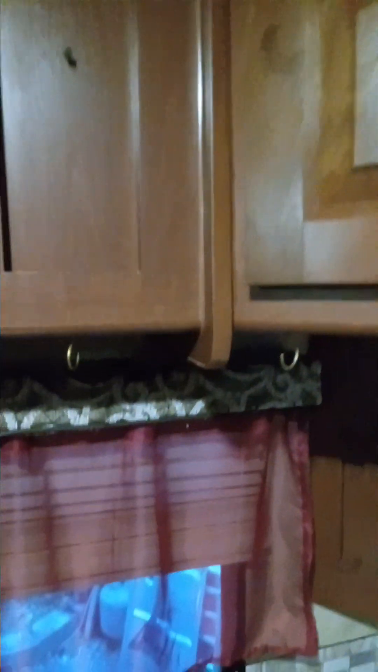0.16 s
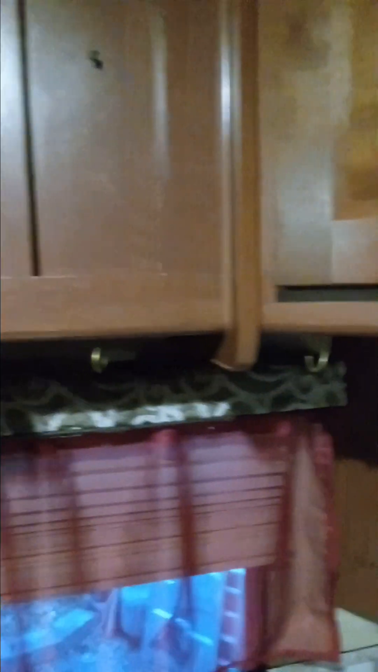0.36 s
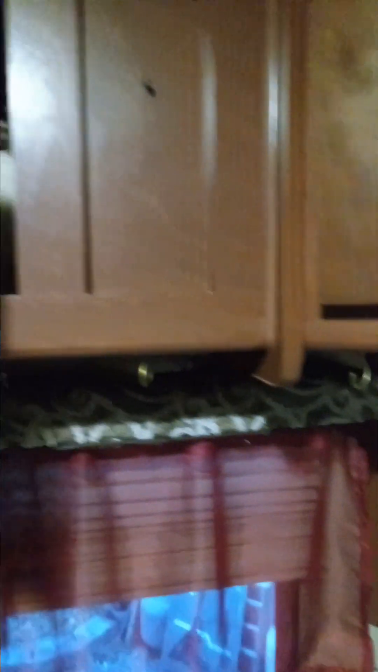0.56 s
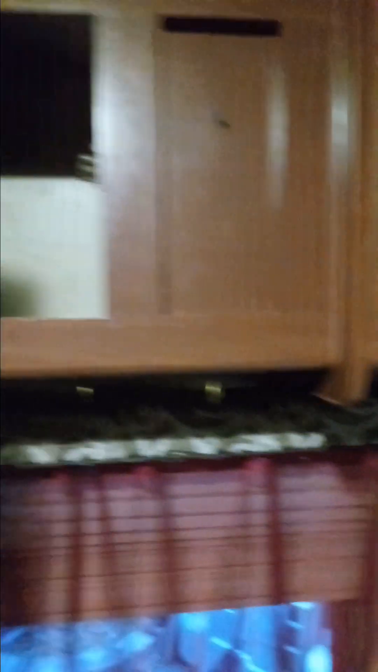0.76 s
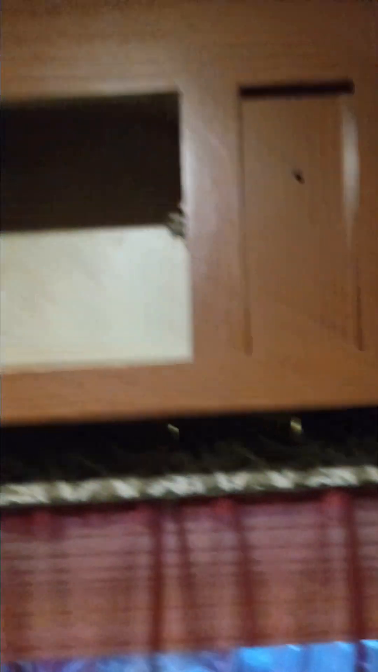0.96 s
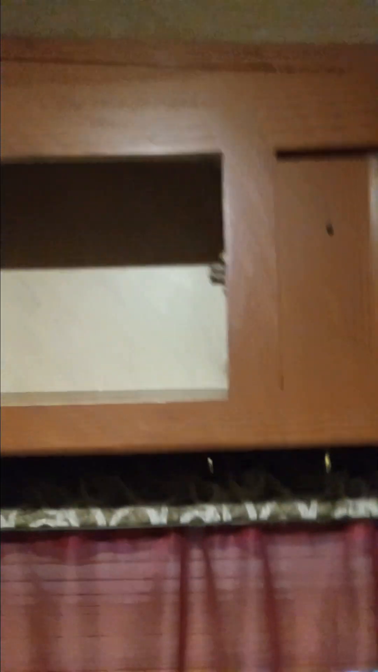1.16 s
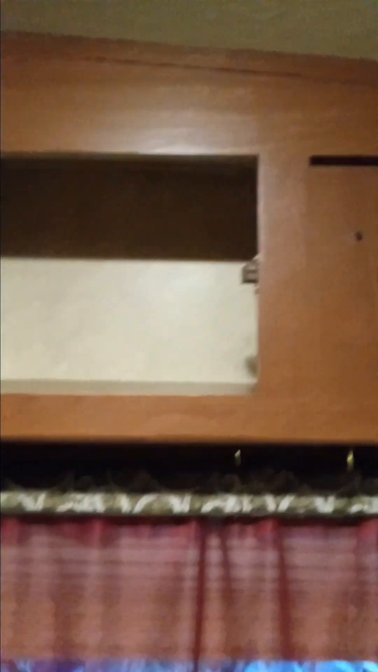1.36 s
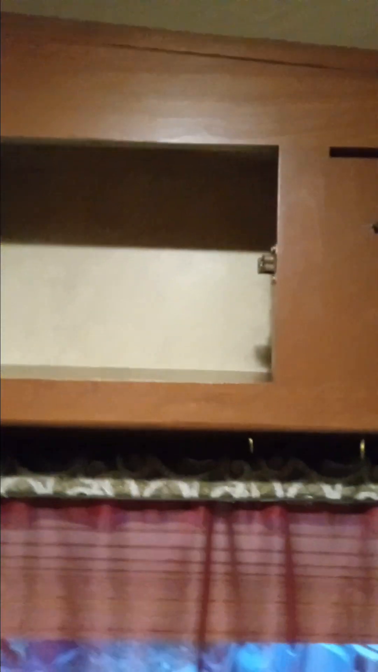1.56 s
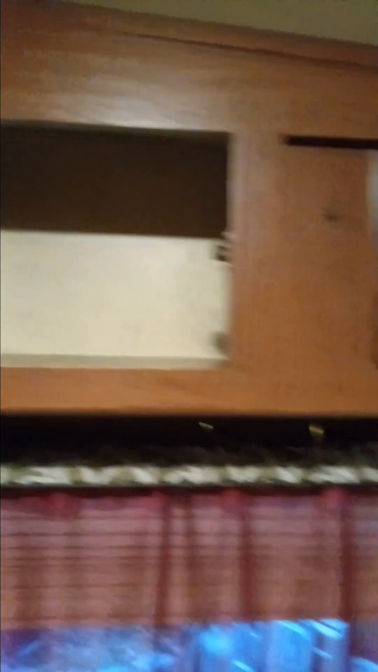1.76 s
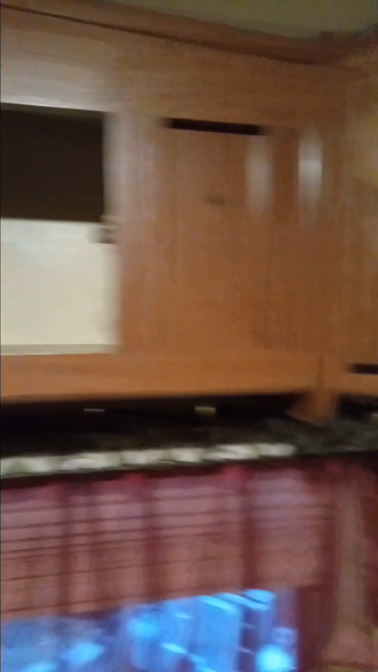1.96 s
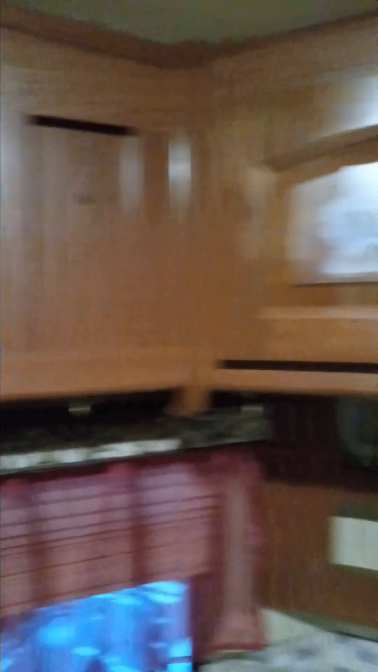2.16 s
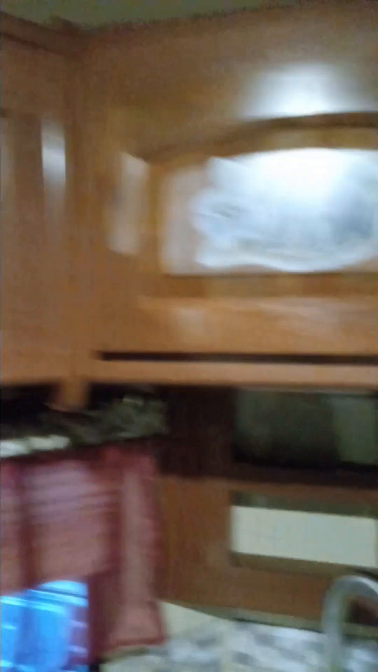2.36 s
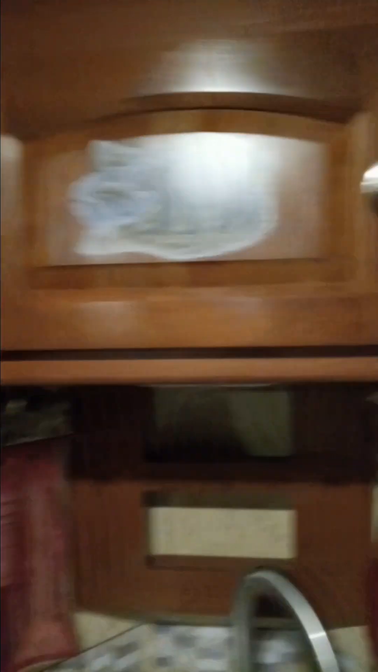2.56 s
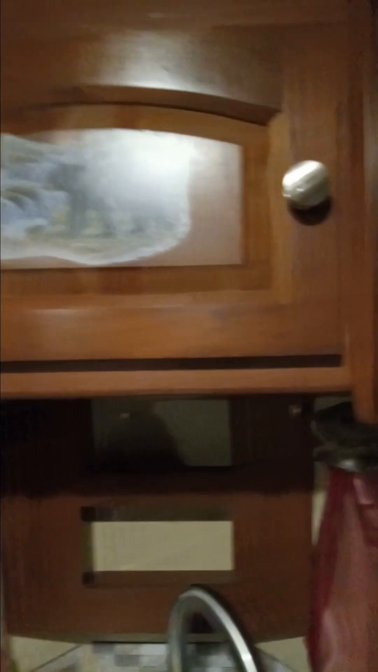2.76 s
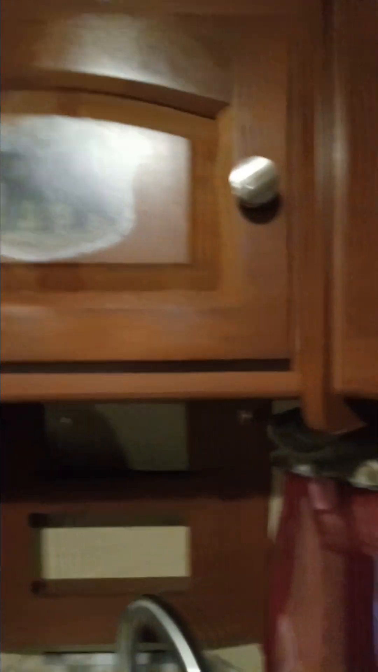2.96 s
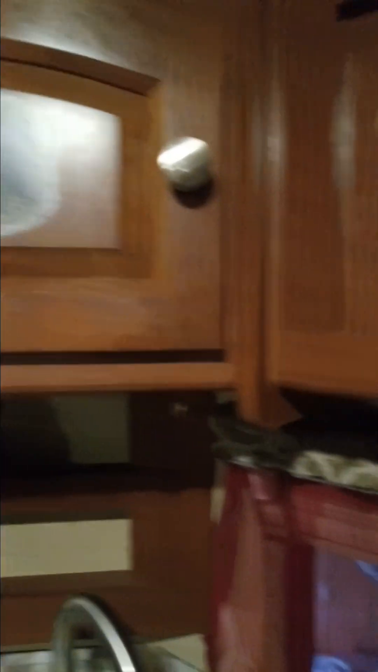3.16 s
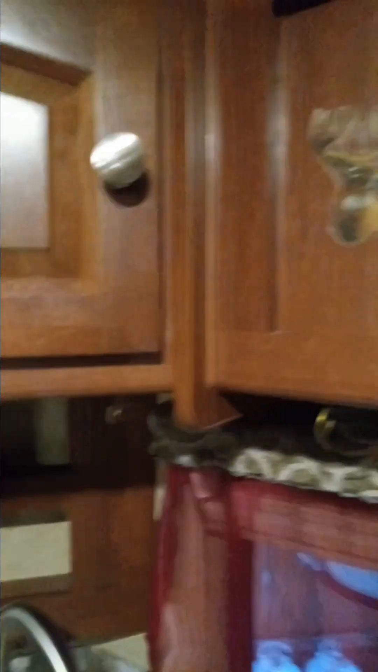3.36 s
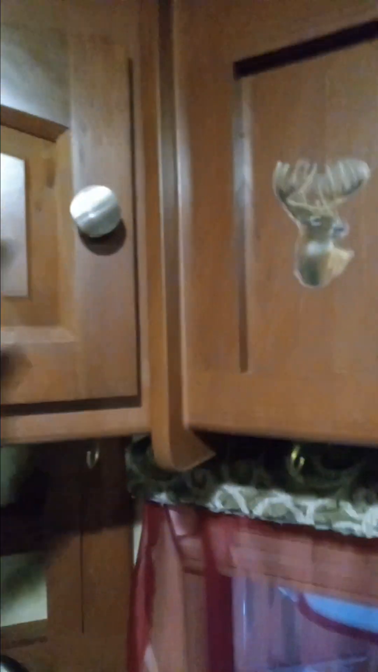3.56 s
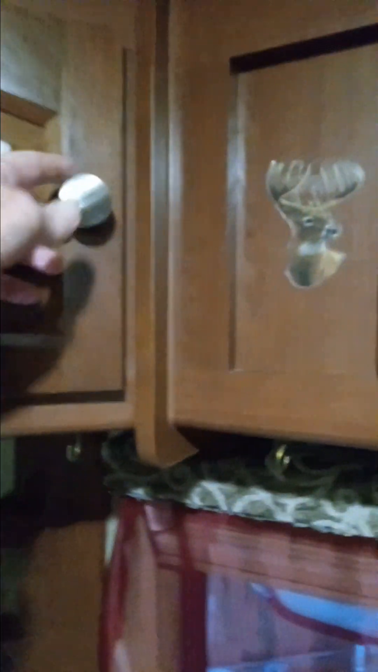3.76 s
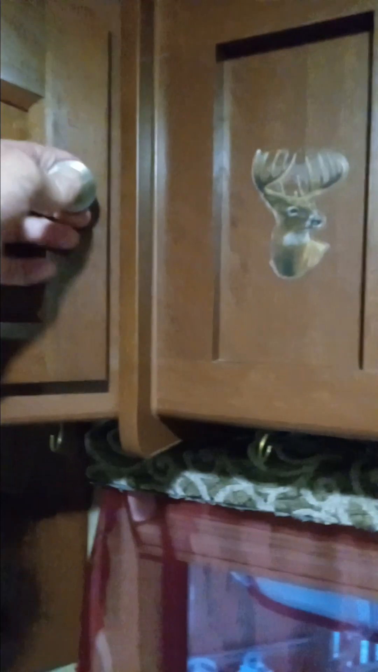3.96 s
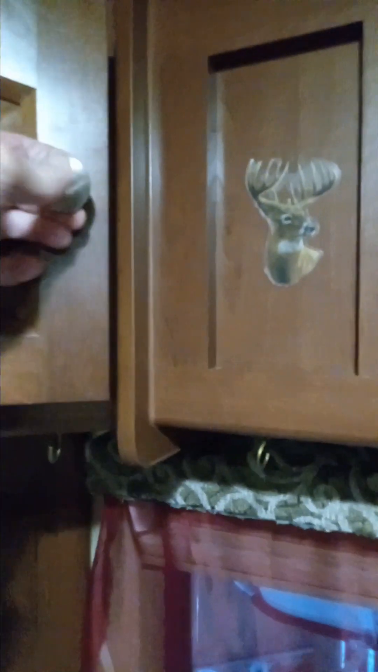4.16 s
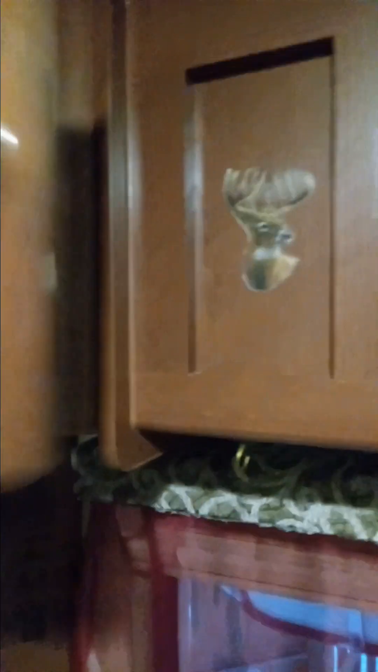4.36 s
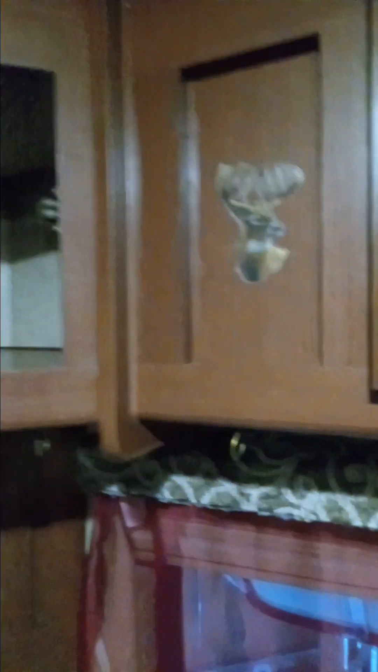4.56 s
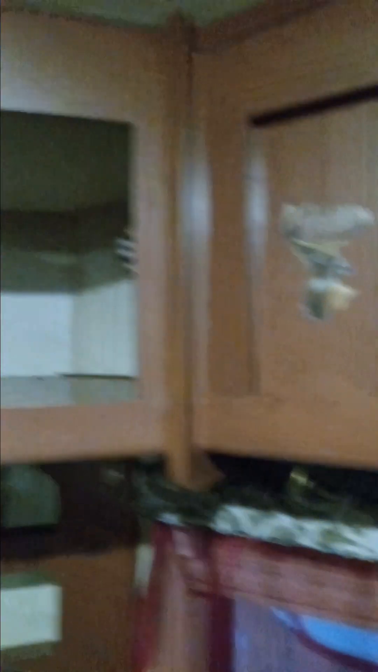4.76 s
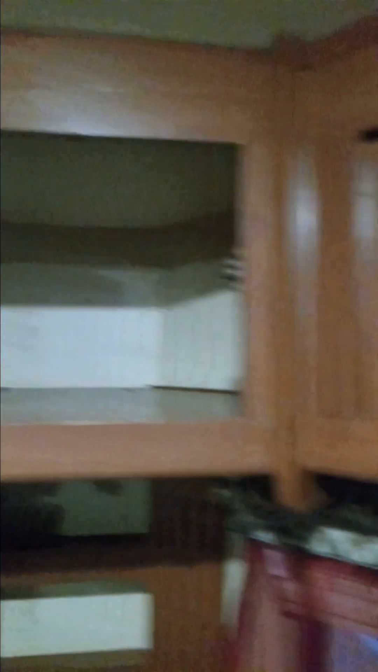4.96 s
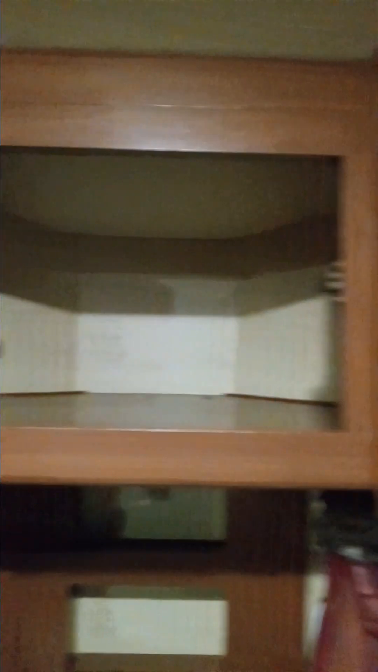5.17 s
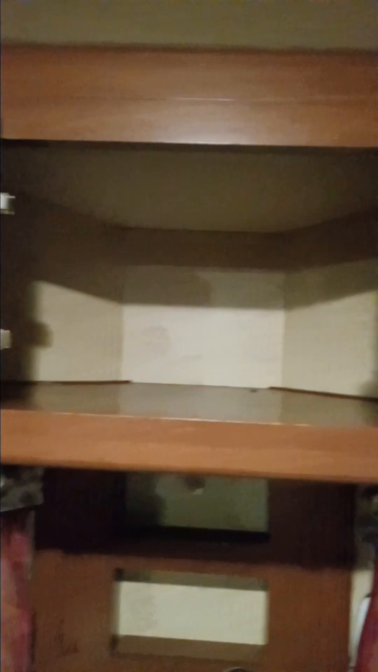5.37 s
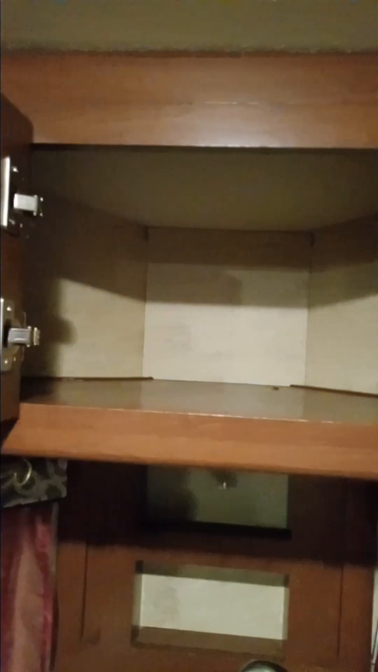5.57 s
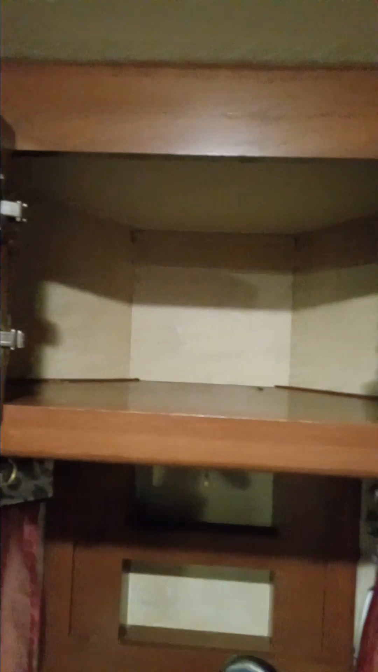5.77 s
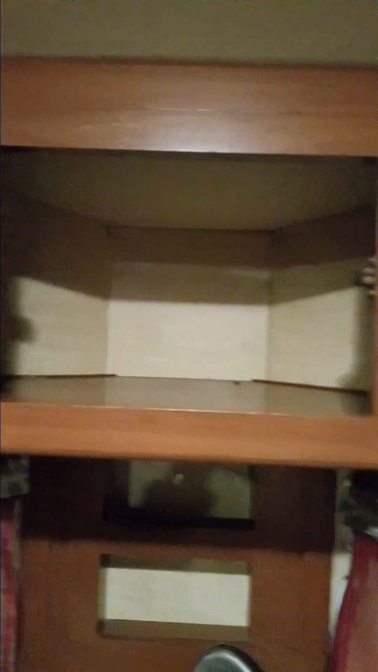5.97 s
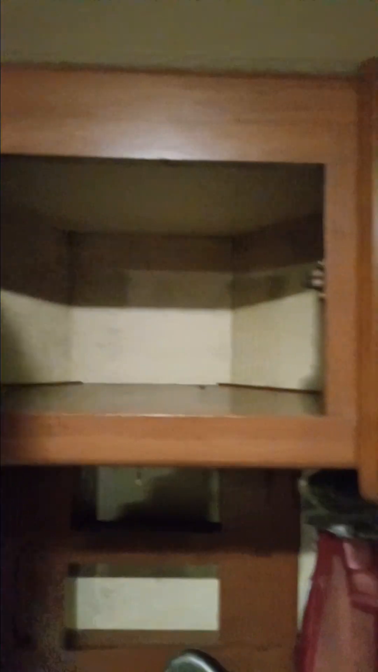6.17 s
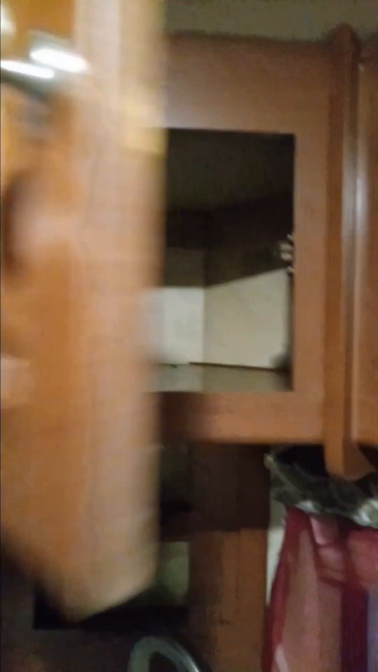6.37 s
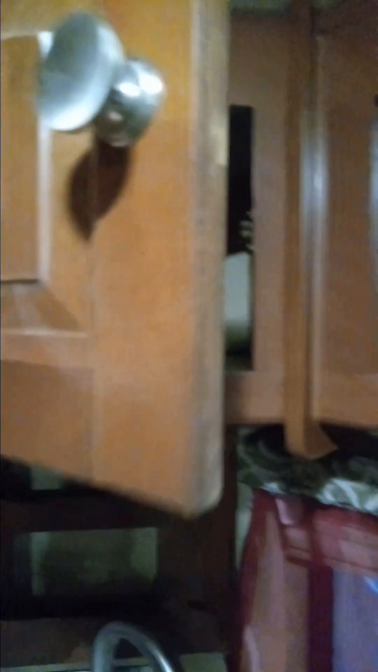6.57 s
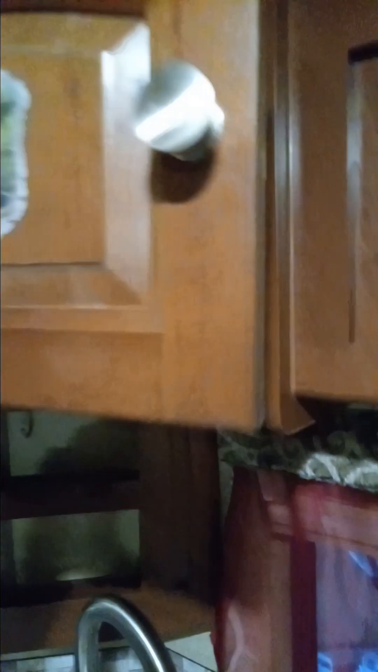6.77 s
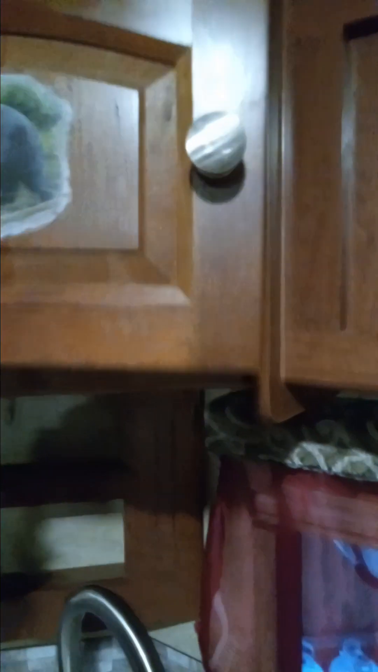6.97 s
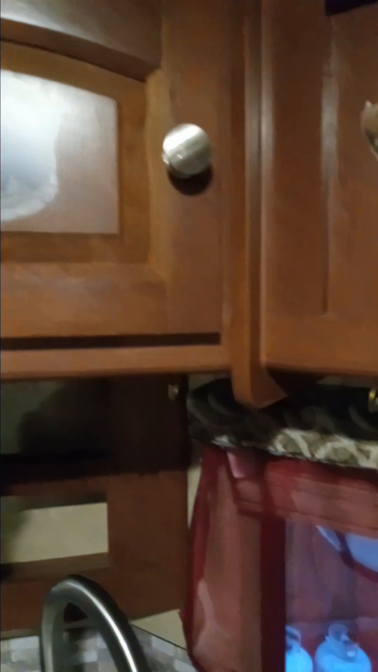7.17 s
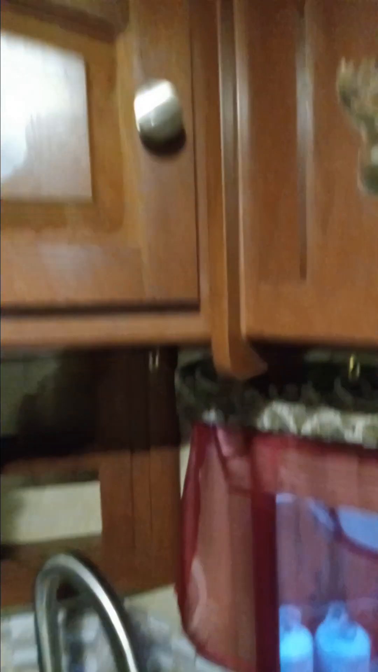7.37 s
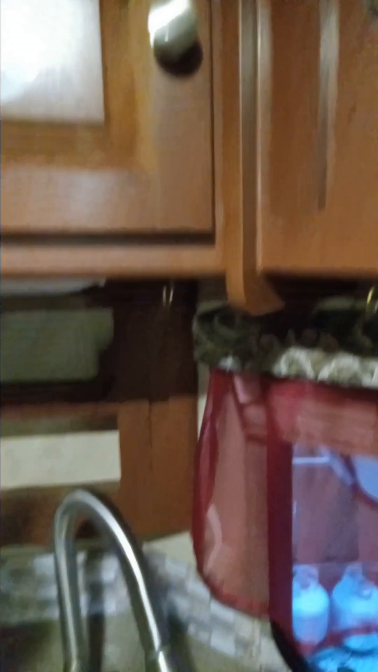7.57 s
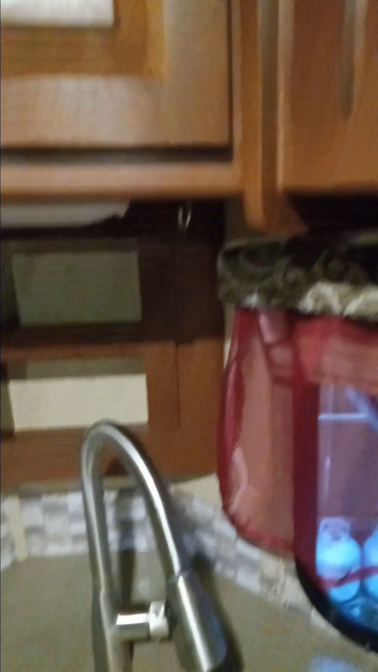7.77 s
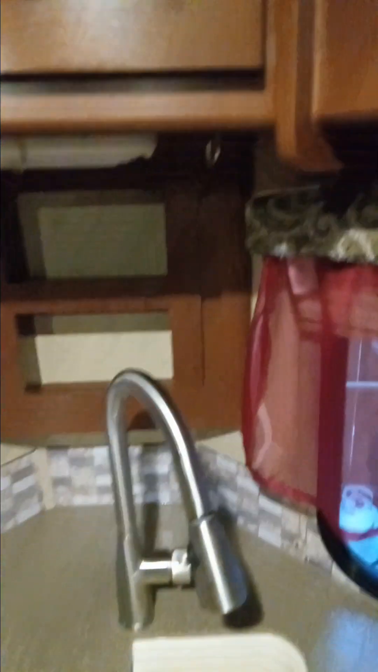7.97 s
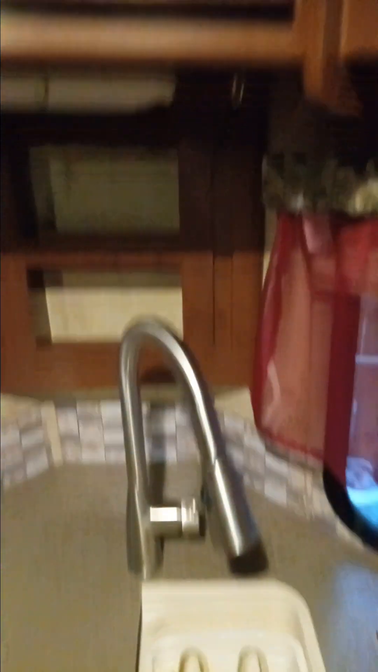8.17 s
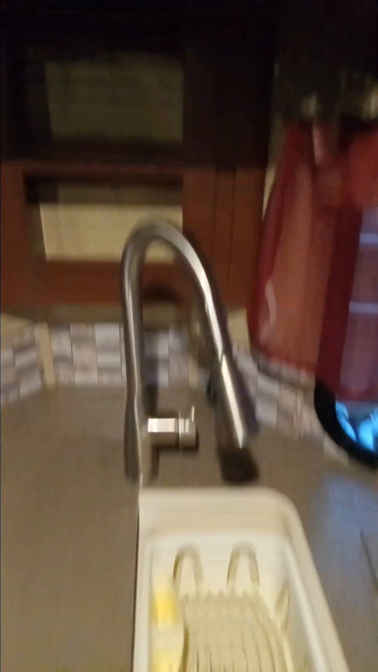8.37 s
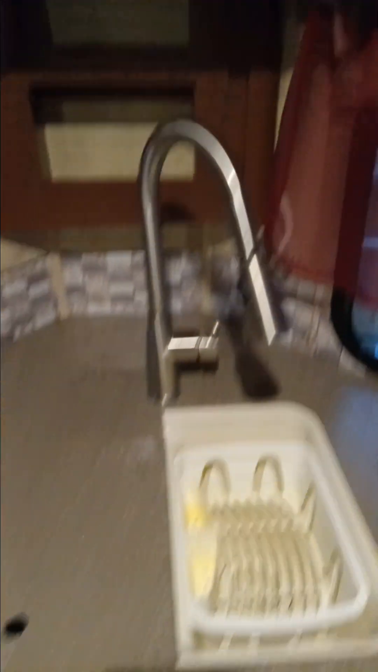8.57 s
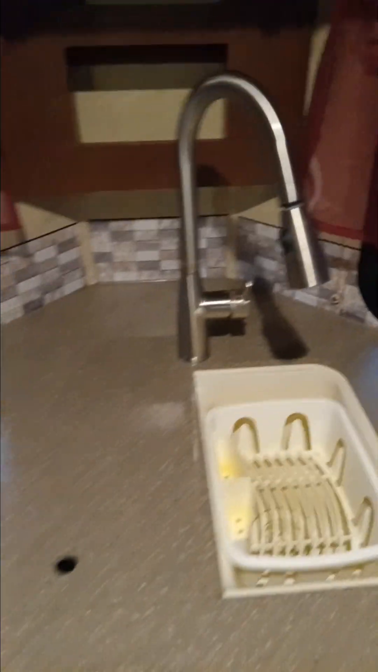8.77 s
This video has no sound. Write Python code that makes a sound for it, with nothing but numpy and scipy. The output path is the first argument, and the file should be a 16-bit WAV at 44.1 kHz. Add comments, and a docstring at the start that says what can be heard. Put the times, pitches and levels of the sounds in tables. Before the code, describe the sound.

Close, scattered wooden thumps and latch clicks as cupboard doors open and close, ending in a slam over faint hiss.

```python
"""A wooden cabinet door thumps and clacks over a faint hiss; more doors open and shut in a small,
thin-walled kitchen, close to a phone. Blows excite the damped modes of panels and walls, and catches
rattle and ring. Sliding friction makes hands and feet scuff and a hinge squeak before a door slams.
The phone's noise suppressor holds the hiss down and cuts the tails short."""
import sys
import numpy as np
from scipy import signal
from scipy.io import wavfile
from scipy.ndimage import uniform_filter1d

SR = 44100
rng = np.random.default_rng(int(sys.argv[2]) if len(sys.argv) > 2 else 0)


def transcribe(u):
    """Save the signal u as a 16-bit wav file named by the first command-line argument.

    u: samples, shape (n,) or (channels, n), limited to [-1, 1]; the rate is SR.
    q: integer samples, one column per channel.
    """
    v = np.clip(np.atleast_2d(u).T, -1, 1)
    q = np.round(v * 32767).astype(np.int16)
    wavfile.write(sys.argv[1], SR, q)


N = 388515


def gain_of(db):
    return 10 ** (np.asarray(db) / 20)


def unit_rms(x):
    return x / np.sqrt(np.mean(x ** 2) + 1e-20)


def curve_at(points, hz):
    """Interpolation along a logarithmic frequency axis."""
    f, value = np.transpose(points)
    return np.interp(np.log(hz + 1), np.log(f + 1), value)


def add(mix, start, sound):
    part = mix[round(start * SR):][:len(sound)]
    part += sound[:len(part)]


def roughness(n, depth_db, span):
    """Log-normal amplitude modulation, smoothed over span samples."""
    return gain_of(depth_db * unit_rms(uniform_filter1d(rng.standard_normal(n), span)))


def colour(x, gain_db):
    """Minimum-phase filtering by a function from Hz to dB, scaled to unit power gain."""
    hz = abs(np.fft.fftfreq(2048, 1 / SR))
    log_gain = np.log(gain_of(np.maximum(gain_db(hz), -100)))
    taps = np.fft.ifft(np.exp(np.conj(signal.hilbert(log_gain)))).real[:1024]
    return signal.oaconvolve(x, taps / np.linalg.norm(taps))[:len(x)]


def modal_ring(modes, centre_hz, octaves, stretch, seconds, bend=1):
    """Superposition of damped modes near centre_hz, peak 1; stretch scales T60, bend > 1 delays the fall."""
    hz, db, t60 = np.transpose(modes)[:, :, None]
    t = np.arange(round(seconds * SR)) / SR
    detune = 1 + 0.028 * rng.uniform(-0.79, 1, hz.shape)
    excitation = gain_of(db) * np.exp(-.5 * (np.log2(hz / centre_hz) / octaves) ** 2)
    decay = np.exp(-np.log(1000) * (t / (t60 * stretch)) ** bend)
    sound = (excitation * decay * np.sin(2 * np.pi * hz * detune * t)).sum(0)
    return sound / abs(sound).max()


# Spectrum of the noise floor once suppressed: f/Hz, relative level/dB
HISS_SPECTRUM = [(25, -32.5), (60, -17), (110, -9.5), (190, -8), (300, -3), (400, -6), (500, -16.5),
                 (650, -10), (1100, -15), (1330, -6), (2150, -7), (2700, -16.5), (4800, -22), (6500, -21),
                 (8500, -32), (10000, -42.5), (14000, -45.5), (15200, -38.5)]
# Slow drift of the noise floor: t/s, gain/dB
HISS_LEVELS = [(0, 3.5), (1.5, 1), (3.502, 2), (4.5, 1.5), (6, 0), (7.598, 1.5), (8.8, 1.5)]
# Greatest attenuation by the suppressor: f/Hz, depth/dB
SUPPRESSION = [(50, 4.5), (150, 13.5), (300, 10), (1000, 3.5), (3000, 5), (8000, 7.5)]


def hiss():
    """Gaussian noise of room and microphone, faintly patchy, at its level before suppression."""
    frames, hz = N // 256 + 5, np.fft.rfftfreq(1024, 1 / SR)
    real, imag, patches = rng.standard_normal((frames, 513, 3)).T
    patches = unit_rms(uniform_filter1d(uniform_filter1d(patches, 10, 0), 12, 1))
    drift_db = np.interp(np.arange(frames) * 256 / SR, *np.transpose(HISS_LEVELS))
    shape = unit_rms(gain_of(curve_at(HISS_SPECTRUM, hz)))
    floor = gain_of(-68.5 + curve_at(SUPPRESSION, hz)) * shape
    spectra = (real + 1j * imag) * floor[:, None] * gain_of(0.9 * patches + drift_db)
    return signal.istft(spectra, nperseg=1024, noverlap=768)[1][:N] / np.sqrt(512)


# Low modes of walls and doors: f/Hz, relative level/dB, unscaled T60/s
WOOD_MODES = [(45, 1, .3), (57.85, 6.5, 1), (79.3, 6.5, 0.41), (99.54, 4.5, 0.57), (126.2, 6.5, 0.29),
              (143, -3.5, .3), (174.5, 1, 0.43), (194.2, 4, 0.57), (221.6, 5, 0.25), (247.5, 2.5, 0.35),
              (300, 11.5, 0.4), (358, 10, 0.19), (399, 3, 0.36)]
# Blows on doors, walls and floor, levels before the envelope:
# t/s, boom level/dB, boom f/Hz, knock level/dB, knock f/Hz, free ringing time/s
BLOWS = [(.002, -35, 161, -30, 177, 0.052), (.037, -38.5, 168, -32, 238, .1),
         (.124, -24.5, 125, -21.5, 207, 0.13), (.16, -24.5, 109.5, -14.5, 222, 0.12),
         (.198, -28, 97.5, -23.5, 233, 0.059), (.234, -32, 104, -26.5, 200, .1),
         (0.41, -34, 135, -33.5, 222.5, 0.088), (.452, -46.5, 144, -52, 206, 0.13),
         (.533, -51.5, 65.6, -55, 215, 0.048), (.621, -43.5, 74.8, -48, 205, .11),
         (2.01, -35.5, 150, -17.5, 219, 0.087), (2.048, -42, 126.7, -52, 221, 0.1),
         (2.2, -50, 90, -43.5, 214, .09), (2.231, -55, 134, -59, 170, 0.07),
         (2.31, -55.5, 57.6, -57, 374, .11), (2.437, -36.5, 125, -38, 216, 0.097),
         (2.567, -17.5, 106, -19, 303, 0.048), (2.622, -30.5, 117, -28, 201, 0.16),
         (2.686, -27.5, 131, -26.5, 212, 0.1), (2.8, -35.5, 83.6, -51, 179, 0.058),
         (2.907, -18, 91.7, -14.5, 204, 0.12), (2.941, -17, 103, -11, 222, 0.077),
         (2.978, -34.5, 88.7, -21, 232, 0.12), (3.051, -27, 102, -33, 173, .08),
         (3.131, -27, 89, -26.5, 212, 0.058), (3.2, -33, 94.4, -55, 180, 0.088),
         (3.256, -49.5, 83.5, -61.5, 178.3, .075), (3.701, -44, 129.3, -68, 176, .1),
         (3.755, -44.5, 94, -59, 194, .055), (3.862, -41, 79.7, -71.5, 172.5, 0.066),
         (3.99, -30.5, 106, -28, 402, 0.065), (4.011, -32.5, 79, -34.5, 382, .07),
         (4.055, -29, 131, -27.5, 213, 0.058), (4.154, -34.5, 118, -32.5, 230, .08),
         (4.2, -57.5, 128, -45.5, 258, .09), (6.118, -52, 92, -60, 304, 0.084),
         (6.189, -54, 111.3, -52, 164, 0.12), (6.399, -46.5, 160, -63, 170, .1),
         (6.444, -37, 115.5, -68, 172, .075), (6.5, -46, 97.2, -60, 173, .09),
         (6.56, -48.5, 98, -59.5, 173, 0.143), (6.7, -56, 97, -53, 401, .12),
         (6.87, -45, 104, -58, 236, 0.13), (6.932, -31, 110.4, -62.5, 195, 0.15),
         (6.961, -29, 107, -27.5, 199, .11), (7.005, -5, 123, -12, 177, .04),
         (7.04, -23, 113, -15, 223, 0.17), (7.069, -19, 61, -18.5, 173, .085),
         (7.138, -19.5, 133, -26.5, 177, 0.078), (7.24, -34.5, 142, -33.5, 171, .11),
         (7.31, -35, 88.8, -60, 175, .085), (7.388, -42, 73, -63, 171, 0.088),
         (7.441, -53, 75.3, -57.5, 203.9, .09), (7.66, -60, 81.8, -66.5, 380, .1),
         (8.24, -61.5, 58.2, -75, 298, .07)]


def thumps():
    """Impact excitation: a soft blow drives low modes, a boom of the walls and a higher knock of the door."""
    out = np.zeros(N)
    for start, boom_db, boom_hz, knock_db, knock_hz, free_s in BLOWS:
        stretch = free_s / 0.15
        boom = modal_ring(WOOD_MODES[:7], boom_hz, 0.31, stretch, seconds=.3, bend=1.6)
        knock = modal_ring(WOOD_MODES[5:], knock_hz, 0.217, 0.94 * stretch, seconds=.3, bend=0.89)
        t = np.arange(len(boom)) / SR
        envelope = (1 - np.exp(-t / .0038)) / (1 + (t / free_s) ** 2.7)
        add(out, start, -(gain_of(boom_db) * boom + gain_of(knock_db) * knock) * envelope)
    return out


# Spectra of hard contact, its top octave and the door edge: f/Hz, relative level/dB
TREBLE_SPECTRUM = [(1530, -12.5), (2600, -7.5), (3310, -8.5), (3610, -6), (3920, -5), (5000, -7),
                   (5410, -6.5), (6260, 0), (6660, -2.5), (7050, -5), (10000, -23.5), (13000, -45),
                   (22000, -120)]
TOP_SPECTRUM = [(7000, -10.5), (9500, -8), (12000, -7.5), (13500, -11), (14800, -3.5), (16000, 2.5)]
EDGE_SPECTRUM = [(210, -28.5), (350, 3), (471, -0.5), (657, -3.5), (1010, -12), (1100, -6.5), (1720, -3.5),
                 (3200, -22), (4160, -49.5), (7040, -120)]
# Modes of the door panel and of metal fittings: f/Hz, relative level/dB, unscaled T60/s
PANEL_MODES = [(504, 4, 0.09), (588, -6.5, 0.04), (692, 0, 0.18), (762, 0.5, 0.32), (783.4, 4.5, 0.11),
               (895, 7.5, 0.11), (991, 5.5, 0.1), (1004, -6, 0.12), (1155, 3, 0.062), (1254, -4, .2),
               (1410, -1.5, 0.16), (1806, 1, 0.11), (1728, -4.5, 0.09), (2092, -10, .12),
               (2083, -6.5, 0.28), (2370, 2.5, 0.038)]
METAL_MODES = [(3395, -6.5, 0.033), (3780, -13.5, 0.081), (4000, 1, 0.059), (4100, 4, 0.12),
               (4935, 1.5, .04), (5373, 0, 0.048), (5970, -0.5, 0.051), (6200, -2, .05),
               (7290, -9.5, 0.039), (7270, 1.5, .03), (8270, 3.5, .03)]
# Catches, knobs and door edges meeting, levels before filtering:
# t/s, treble level/dB, top level/dB, edge level/dB, rattle T60/s, panel f/Hz, metal f/Hz
CONTACTS = [(0.0364, -24, -35.5, -22.5, .085, 2050, 4690), (.077, -40, -64, -37.5, .11, 2120, 3750),
            (0.1255, -40, -59.5, -34, .13, 490, 6330), (0.1444, -21, -28.5, -25, .09, 1330, 6170),
            (0.162, -23, -48.5, -24, .09, 756, 3560), (0.4123, -74, -98, -44, .13, 695, 3640),
            (0.578, -50, -93, -56.5, .16, 2360, 6650), (1.8419, -62, -101, -53, .11, 1430, 6660),
            (2.0117, -32.5, -78, -26, .08, 1870, 5330), (2.5735, -48, -94.5, -32, .17, 885, 5060),
            (2.6889, -43.5, -86, -43, .1, 2060, 3440), (2.9078, -28, -40, -25, 0.081, 1635, 3344),
            (3.164, -37, -48.5, -42.5, .12, 2160, 7400), (3.7741, -34.5, -85, -52, .13, 1670, 6610),
            (3.909, -61, -72.5, -73, .04, 1600, 8156), (3.955, -62, -71.5, -74.5, .04, 1620, 6200),
            (3.9906, -28.5, -42.5, -24.5, .12, 1600, 6670), (4.0148, -30.5, -44, -24, .13, 1470, 6020),
            (4.0597, -38.5, -76, -37, .1, 690, 6440), (4.1574, -69.5, -88, -50.5, .11, 680, 3300),
            (5.1367, -57.5, -100, -72, .11, 1690, 6670), (6.1018, -62, -82, -49.5, .11, 1800, 6130),
            (6.173, -46.5, -69, -48.5, .1, 2207, 6560), (6.1894, -55, -76, -46, .1, 795, 6310),
            (6.8949, -63, -80, -43, .14, 1680, 3300), (6.9305, -59, -83, -34.5, .1, 820, 4440),
            (6.987, -22, -32.5, -22.5, .14, 1726, 6340), (7.0022, -33, -27, -21, .12, 727, 6440),
            (7.0337, -35.5, -38, -21, .21, 1820, 6140), (7.0689, -29.5, -53, -20, .17, 730, 3313),
            (8.202, -48, -59, -80, .1, 1610, 4360), (8.2069, -34.5, -63.5, -48.5, .11, 1710, 7420)]


def clacks():
    """Brief hard contact is broadband: a tick and an uneven rattle, with panel and metal set ringing."""
    treble, top, edge, ringing = np.zeros((4, N))
    t = np.arange(SR // 5) / SR
    tick_share = .42
    tick = 1.1 * np.exp(-t / 0.0019)
    for start, treble_db, top_db, edge_db, t60, panel_hz, metal_hz in CONTACTS:
        noise = rng.standard_normal(len(t))
        rattle = roughness(len(t), 1.4, 90) * (1 - np.exp(-t / 0.001674)) * gain_of(-60 * t / t60)
        burst = noise * (tick_share * tick + (1 - tick_share) * rattle)
        metal_band = signal.butter(1, [metal_hz / 2.35, metal_hz * 1.7], "band", fs=SR)
        panel_band = signal.butter(2, [panel_hz / 2.79, panel_hz * 2.4], "band", fs=SR)
        add(treble, start, gain_of(treble_db) * signal.lfilter(*metal_band, burst))
        add(top, start, gain_of(top_db) * burst)
        add(edge, start, gain_of(edge_db) * signal.lfilter(*panel_band, burst))
        panel = modal_ring(PANEL_MODES, panel_hz, octaves=.45, stretch=0.54, seconds=.2)
        metal = modal_ring(METAL_MODES, metal_hz, octaves=.1, stretch=0.69, seconds=.08)
        add(ringing, start, gain_of(edge_db + 6) * panel * (1 - np.exp(-t / 0.00095)))
        add(ringing, start, gain_of(treble_db - 0.5) * metal)
    bands = [(treble, TREBLE_SPECTRUM), (top, TOP_SPECTRUM), (edge, EDGE_SPECTRUM)]
    return ringing + sum(colour(x, lambda f: curve_at(spectrum, f)) for x, spectrum in bands)


# In order: cabinet box, catch spring, hollow click, dry crack, knob, roller catch snapping free,
# glass pane of the slammed door, hard tap: t/s, level/dB, rise/s, modes (f/Hz, relative level/dB, T60/s)
RESONATORS = [(.127, -36, .004, [(450, 4.5, .1), (345, -4.5, .15), (560, -8, .08)]),
              (.164, -39.5, .02, [(2527, 1, .26), (3671, 0, .092), (6950, -9, .32)]),
              (2.312, -44.5, .01, [(2500, -2, .07), (2150, 0.5, .07)]),
              (2.907, -28.5, 0.00038, [(3690, -2.5, .025), (3990, -2, 0.016)]),
              (3.774, -50, .002, [(1557, 1.5, .06)]), (3.9898, -21, .0003, [(6000, 1, .014),
              (5500, -2, .014), (6700, 1.5, .014), (1650, -18.5, .03), (2560, -16.5, .1)]),
              (7.005, -45.5, .01, [(727, -1, .55), (402, 0.5, .45), (1030, -10.5, .55)]),
              (8.201, -43.5, .001, [(4380, 0.5, 0.041), (4140, -2, 0.043)])]


def struck_parts():
    """Free vibration: box, fittings, spring and glass ring at their natural frequencies after a blow."""
    t, out = np.arange(SR // 2) / SR, np.zeros(N)
    for start, level_db, rise, modes in RESONATORS:
        tones = sum(gain_of(level_db + db - 60 * (t / t60) ** 1.71) * np.sin(2 * np.pi * hz * t)
                    for hz, db, t60 in modes)
        add(out, start, tones * (1 - np.exp(-t / rise)))
    return out


# Spectrum of sliding contact: f/Hz, relative level/dB
FRICTION_SPECTRUM = [(290, -46), (500, -6), (613, 4), (807, -26), (974, -2), (1130, -17), (1260, -4.5),
                     (2160, 0), (3200, -8), (6610, -1), (16000, -48)]
# Hands and soles sliding: t/s, level/dB, rise/s, fall/s, low cutoff f/Hz, tilt/(dB per octave)
STROKES = [(2.108, -47, 0.024, .026, 900, 1), (2.308, -41, 0.02, 0.016, 1440, -0.9),
           (2.76, -56, .036, .026, 2440, -0.6), (3.105, -45, 0.045, 0.016, 540, -1.5),
           (3.691, -57.5, .028, .035, 1206, -5.5), (4.3, -64, 0.038, 0.019, 800, -4),
           (6.30, -66, .04, .05, 3030, 3.5), (6.39, -55.5, 0.026, .055, 606, -.4),
           (6.599, -60, 0.04, .09, 1500, -1), (6.78, -61.5, .05, 0.035, 1013, -2.8),
           (7.744, -50, .054, 0.03, 1350, -4)]


def scuffs():
    """Sliding friction gives gritty noise that swells and fades with each stroke."""
    out, t = np.zeros(N), np.arange(SR // 3) / SR
    for start, db, rise, fall, low_hz, tilt in STROKES:
        def spectrum_db(f):
            low_cut_db = 10 * np.log10(1 + (low_hz / (f + 1)) ** 6)
            return curve_at(FRICTION_SPECTRUM, f) + tilt * np.log2(f / 3000 + 0.0083) - low_cut_db

        grit = unit_rms(rng.standard_normal(len(t)) * roughness(len(t), 0.88, 120))
        envelope = np.minimum(t / rise, 1) ** 0.8 * np.exp(-np.maximum(t - rise, 0) / fall)
        add(out, start, gain_of(db) * envelope * colour(grit, spectrum_db))
    return out


# Dry rubbing as the door swings: t/s, hiss level/dB, ringing level/dB
HINGE_SWING = [(6.05, -104, -106), (6.152, -81, -73), (6.174, -58, -85), (6.238, -102, -76),
               (6.41, -69, -66.5), (6.478, -66, -68), (6.576, -83, -73), (6.625, -66, -71),
               (6.768, -77, -79.5), (6.848, -75, -79), (6.951, -84.5, -78.5)]
# Modes of the hinge metal: f/Hz, relative level/dB, unscaled T60/s
HINGE_RESONANCES = [(3900, -4, .012), (4800, -3, .015), (5600, -2, .012), (6050, 0, .015), (6500, 0, .012),
                    (7000, -4, .012), (9300, -6, .012)]


def hinge_rub():
    """Stick-slip friction: fine slips hiss in the top octave, coarser ones ring the metal."""
    times, hiss_db, ringing_db = np.transpose(HINGE_SWING)
    t = np.arange(times[0], times[-1], 1 / SR)
    n, slips_per_s = len(t), 70
    fine_slips = unit_rms(roughness(n, 4.0, 150) * rng.standard_normal(n))
    fine_slips *= gain_of(np.interp(t, times, hiss_db))
    spectrum = [(6000, -33.0), (9000, 4.5), (12000, -15.0), (14500, -5.0), (16000, 4.5)]  # f/Hz, level/dB
    fine_hiss = colour(fine_slips, lambda f: curve_at(spectrum, f))
    ringing = np.zeros(n)
    for hz, db, t60 in HINGE_RESONANCES:
        strength = gain_of(3 * np.minimum(rng.exponential(1, n), 3))
        coarse_slips = strength * (rng.random(n) < slips_per_s / SR)
        response = modal_ring([(hz, db, t60)], hz, octaves=1, stretch=0.91, seconds=0.031)
        ringing += gain_of(db) * signal.oaconvolve(coarse_slips, response)[:n]
    ringing = unit_rms(ringing) * gain_of(np.interp(t, times, ringing_db))
    out = np.zeros(N)
    add(out, times[0], (fine_hiss + ringing) * signal.windows.tukey(n, .1))
    return out


# Short squeaks of the hinge: t/s, level/dB, duration/s, f/Hz
HINGE_TONES = [(6.10, -63, 0.066, 1786), (6.27, -71, .1, 4800), (6.31, -68.5, .1, 6300),
               (6.385, -65, .07, 3950), (6.39, -55.5, 0.046, 1720), (6.61, -63.5, 0.057, 5810),
               (6.66, -66.5, .08, 434.6), (6.75, -73, 0.086, 5970), (6.815, -60, .075, 5940),
               (7.275, -67.5, .06, 5594)]


def hinge_squeaks(bandwidth_hz=90):
    """Narrow-band friction tones: random modulation broadens each spectral line."""
    out = np.zeros(N)
    pole = np.exp(-np.pi * bandwidth_hz / SR)
    for start, db, duration, hz in HINGE_TONES:
        t = np.arange(round(duration * SR)) / SR
        complex_noise = [1, 1j] @ rng.standard_normal((2, SR // 5))
        wobble = signal.lfilter([1], [1, -pole], complex_noise)[-len(t):]
        squeak = unit_rms((wobble * np.exp(2j * np.pi * hz * t)).real)
        add(out, start, gain_of(db) * squeak * signal.windows.tukey(len(t), .6))
    return out


# Reverberation time of the kitchen: f/Hz, T60/s
ROOM_T60 = [(400, 0.35), (1000, 0.27), (2500, 0.33), (6000, 0.2), (12000, 0.17)]


def reverberation(x):
    """Convolution with sparse reflections of random sign, each band decaying at its own rate."""
    taps = np.zeros(SR // 2)
    slots = np.arange(150, len(taps) - 20, 20)
    taps[slots + rng.integers(0, 20, len(slots))] = rng.choice([-1., 1.], len(slots))
    hz, t, spectra = signal.stft(taps, SR, nperseg=256)
    decay = gain_of(-60 * t / curve_at(ROOM_T60, hz)[:, None])
    tail = signal.istft(spectra * decay, SR, nperseg=256)[1]
    return signal.oaconvolve(x, tail / np.linalg.norm(tail))[:N]


def scene():
    """Linear superposition in one channel; only the clacks and the friction sounds reverberate."""
    sharp = clacks() + scuffs() + hinge_rub() + hinge_squeaks()
    return (sharp + gain_of(-7.5) * reverberation(sharp) + thumps() + struck_parts() + hiss())[None]


def record(dry):
    """Spectral subtraction lowers each band near its noise floor, between a bass cut and a band limit."""
    bass_cut = signal.butter(2, 48, "high", fs=SR)
    hz, _, spectra = signal.stft(signal.lfilter(*bass_cut, dry[0]), SR, nperseg=1024, noverlap=768)
    power = uniform_filter1d(abs(spectra) ** 2, size=4, axis=0)
    power = abs(uniform_filter1d(power, size=5, axis=1)) + 1e-20
    floor = np.percentile(power, 30, axis=1, keepdims=True)
    gain = np.sqrt(np.maximum(1 - 2.1 * floor / power, 0))
    least_gain = gain_of(-curve_at(SUPPRESSION, hz))[:, None]
    clean = signal.istft(spectra * np.maximum(gain, least_gain), nperseg=1024, noverlap=768)[1]
    band_limit = signal.firwin(511, 15900, window=("kaiser", 9), fs=SR)
    return signal.oaconvolve(clean[:N], band_limit, "same")[None]


dry = scene()
out = record(dry)
transcribe(out)
```